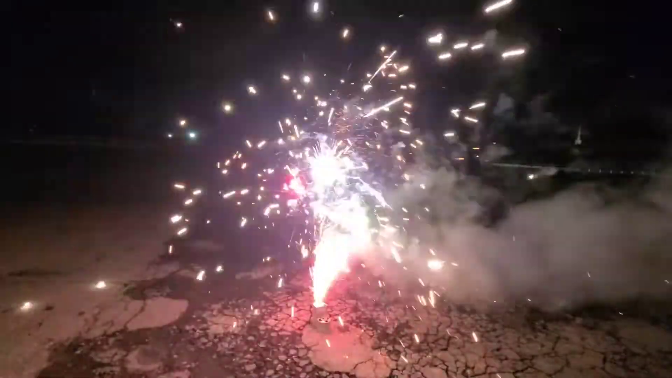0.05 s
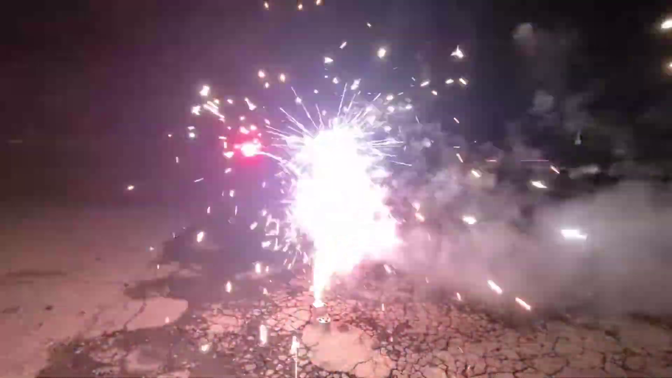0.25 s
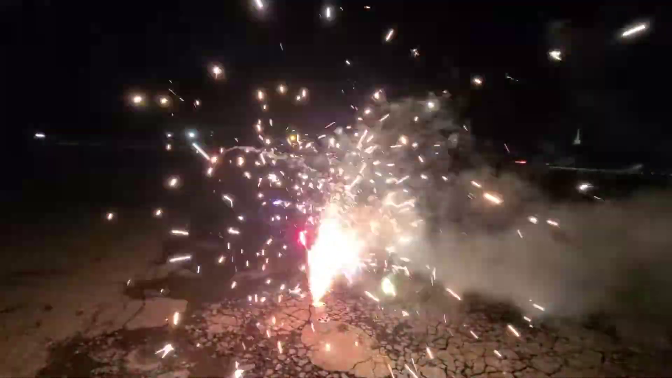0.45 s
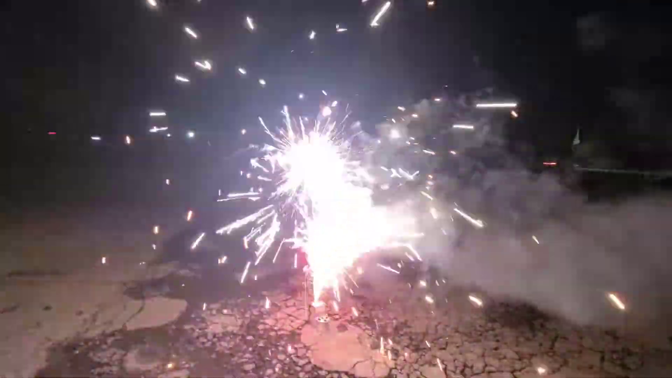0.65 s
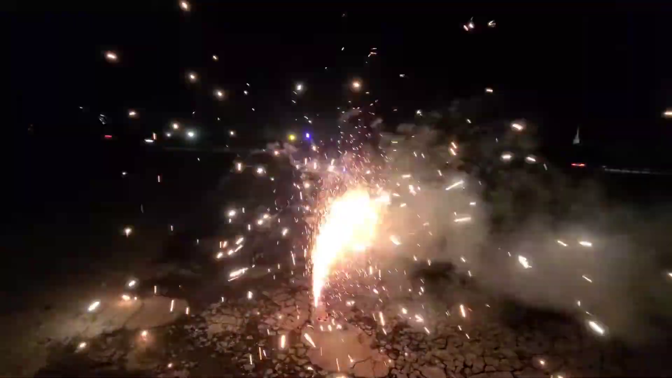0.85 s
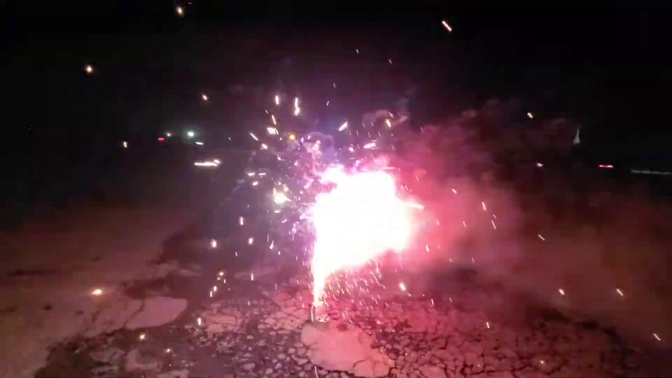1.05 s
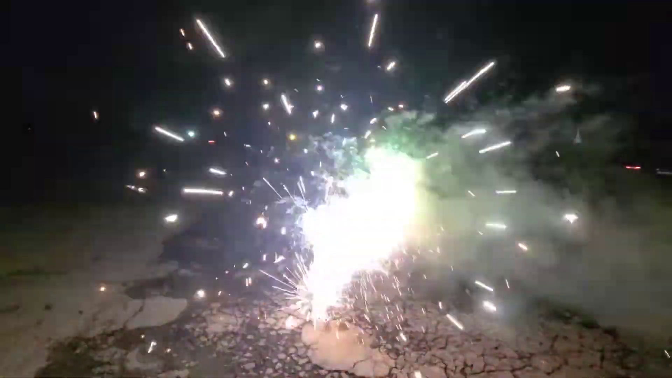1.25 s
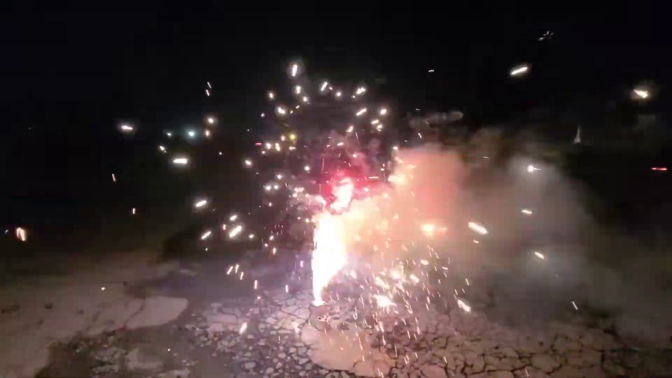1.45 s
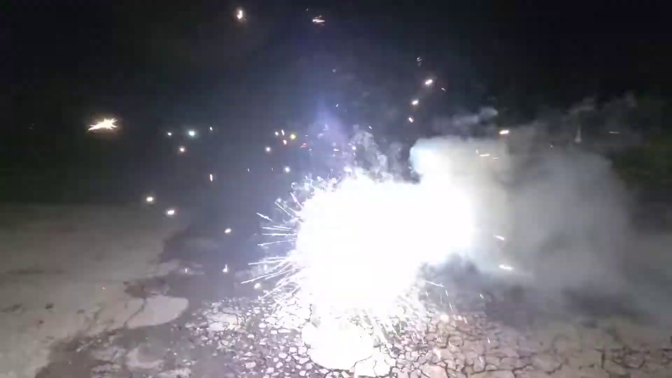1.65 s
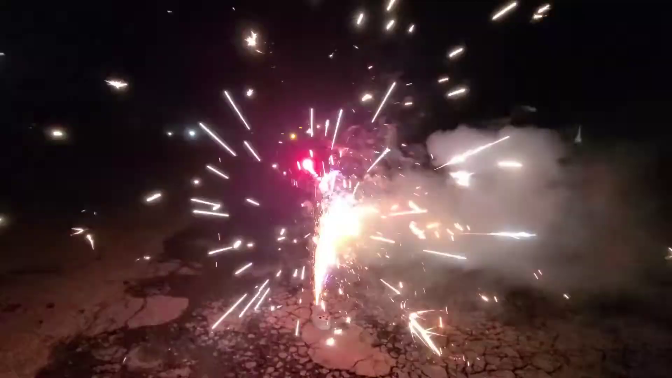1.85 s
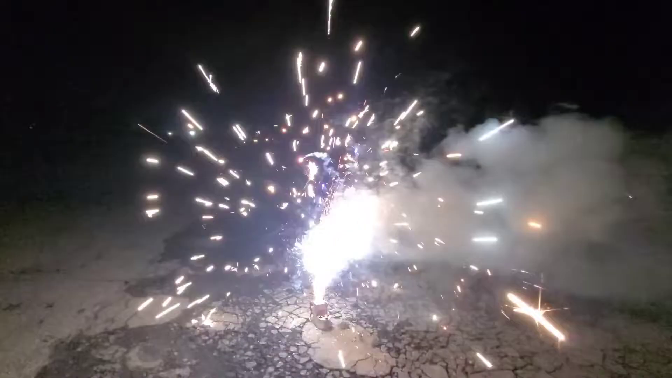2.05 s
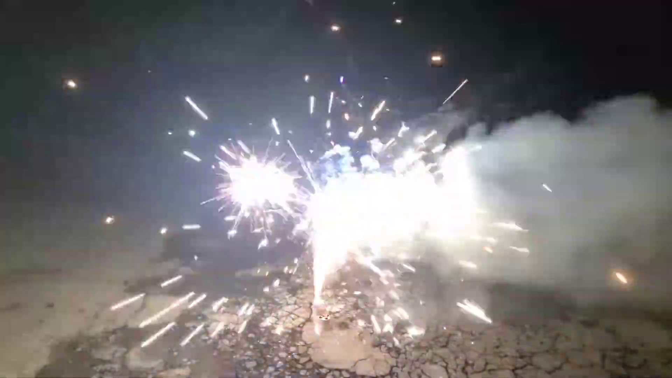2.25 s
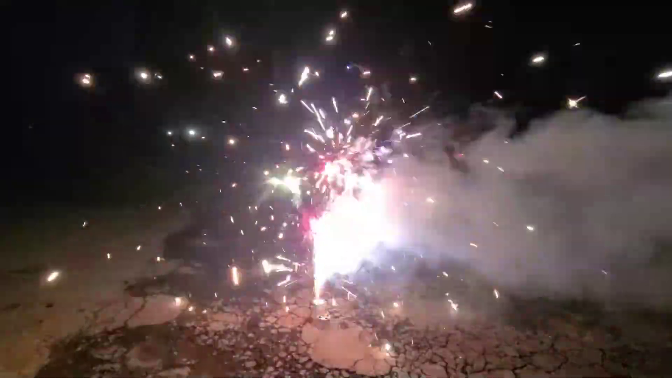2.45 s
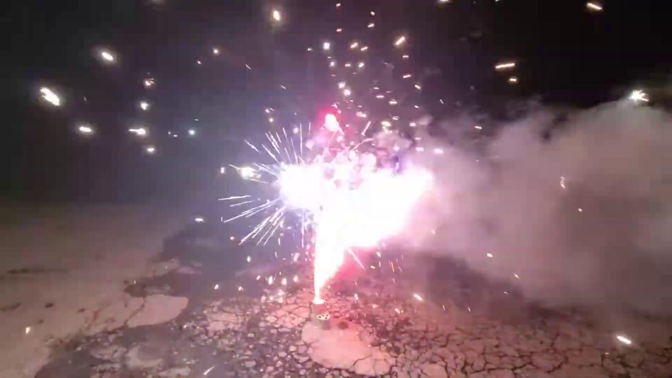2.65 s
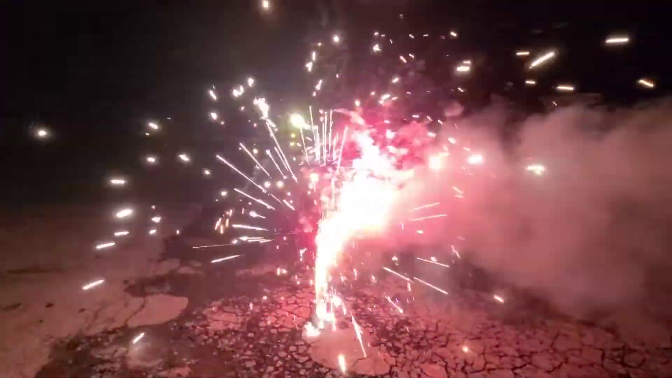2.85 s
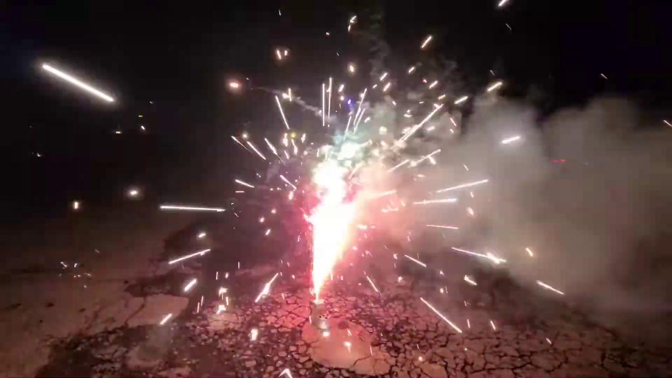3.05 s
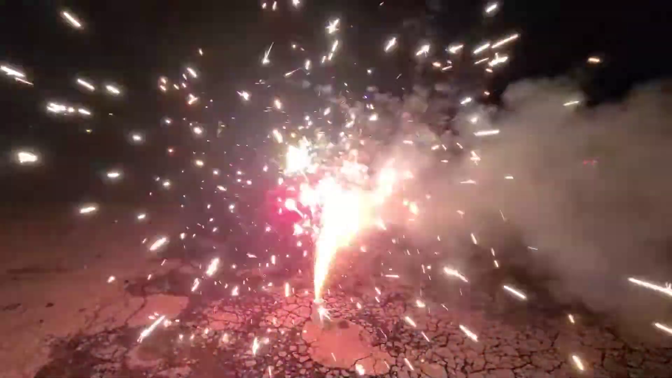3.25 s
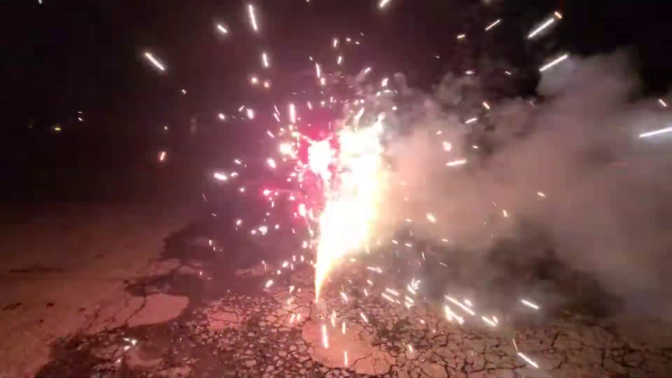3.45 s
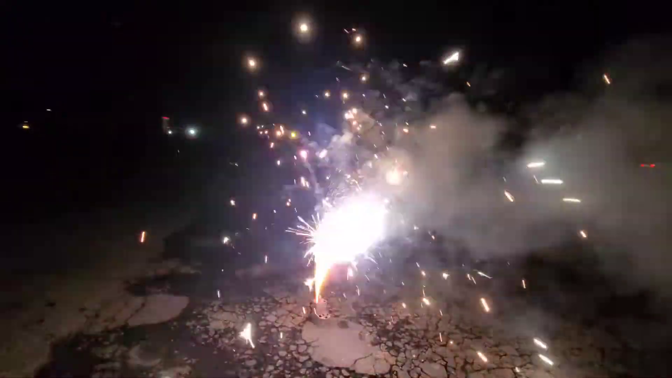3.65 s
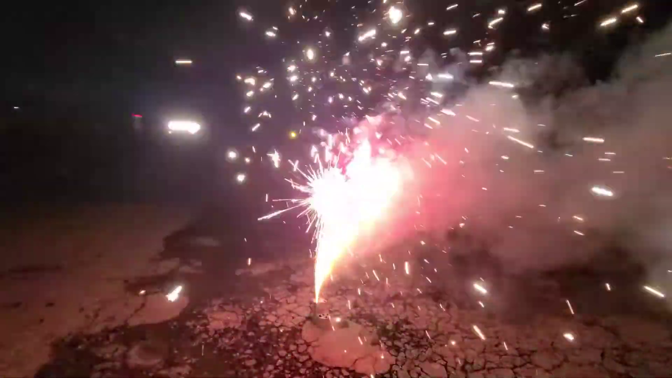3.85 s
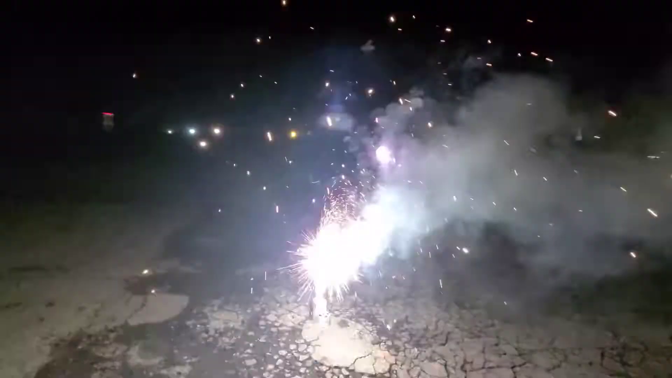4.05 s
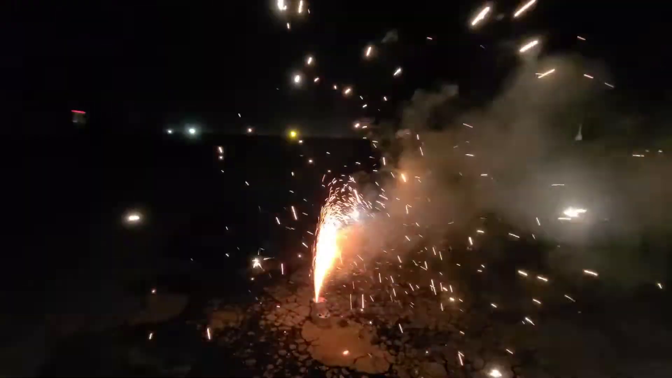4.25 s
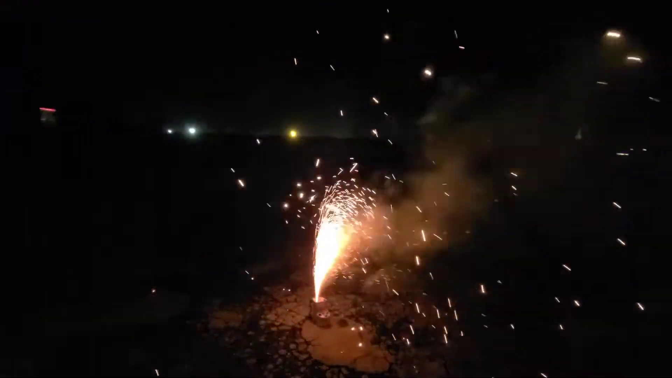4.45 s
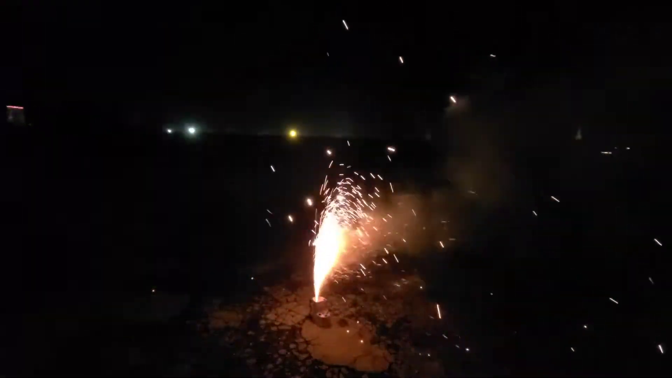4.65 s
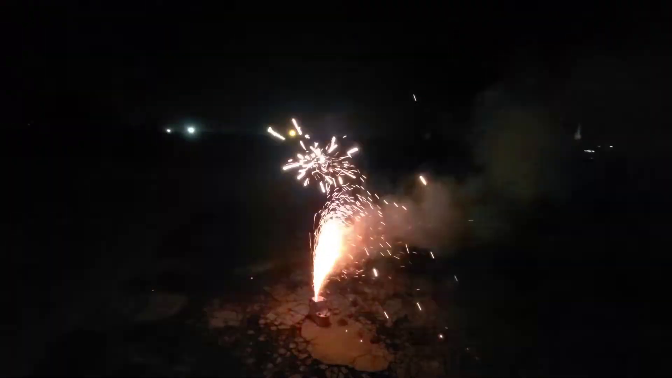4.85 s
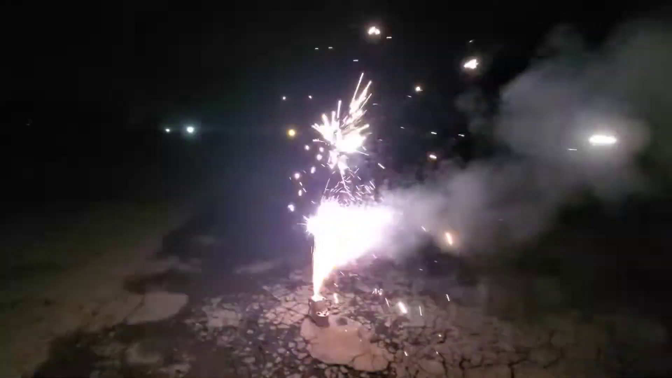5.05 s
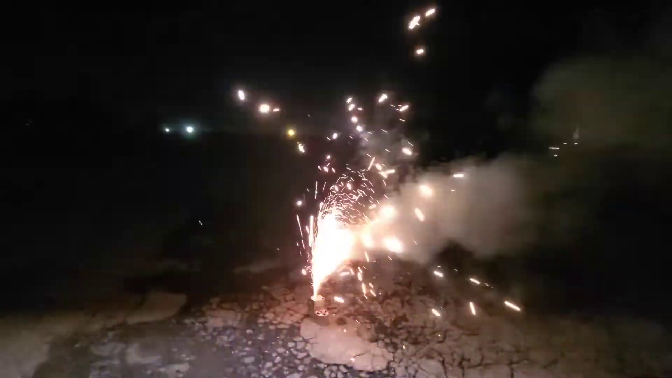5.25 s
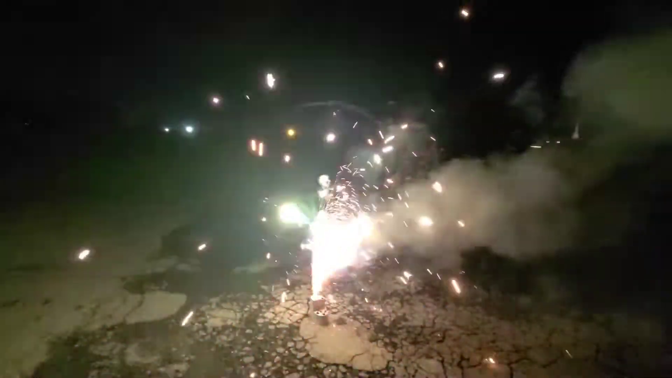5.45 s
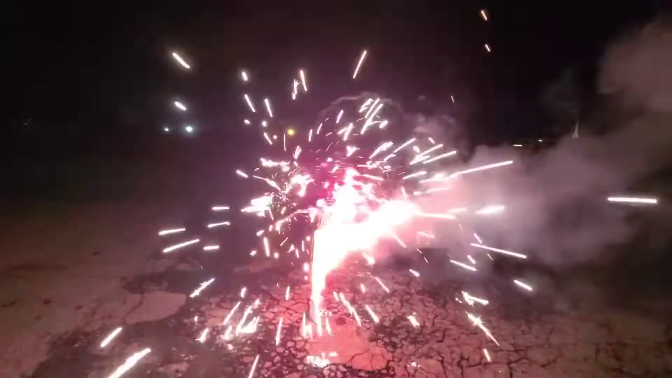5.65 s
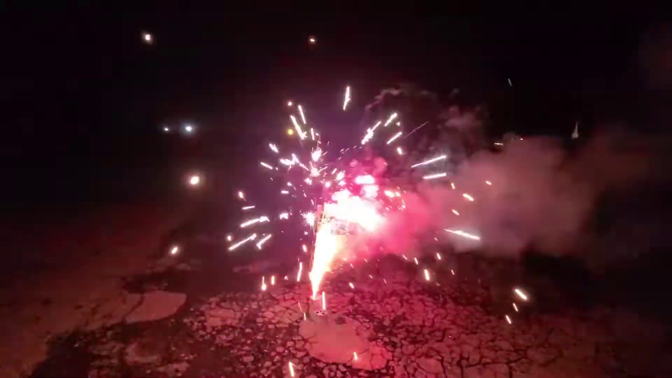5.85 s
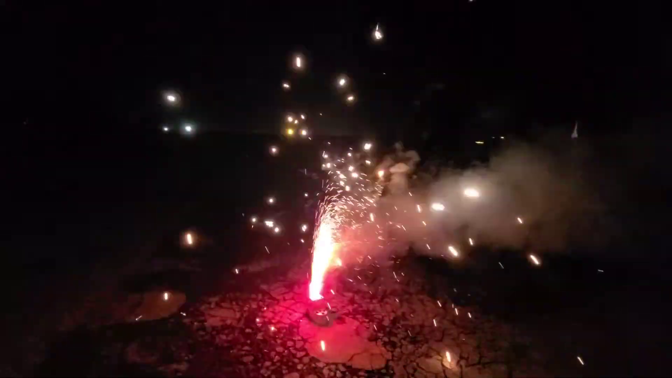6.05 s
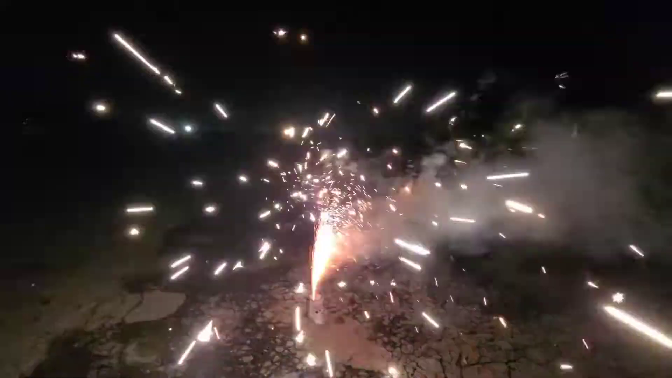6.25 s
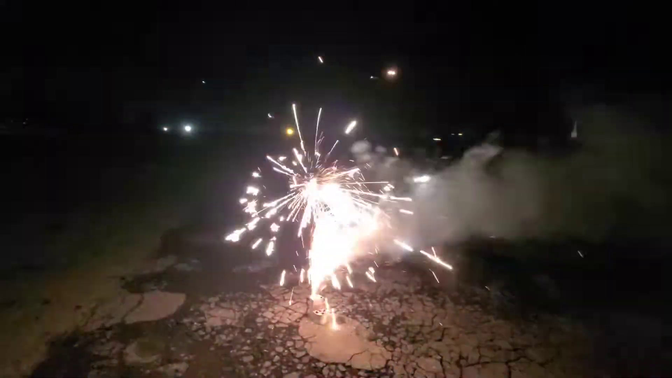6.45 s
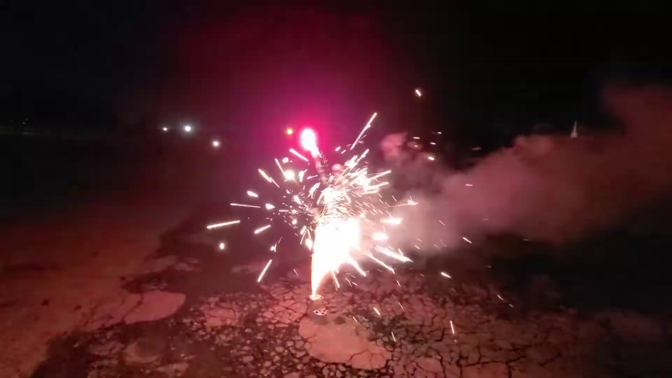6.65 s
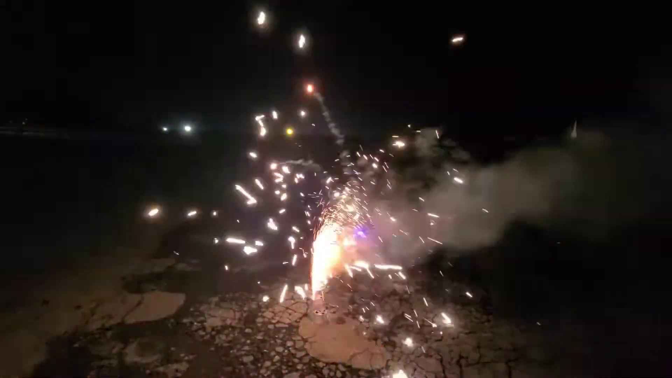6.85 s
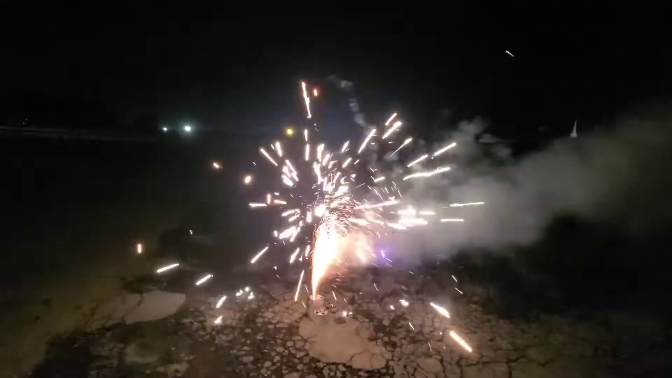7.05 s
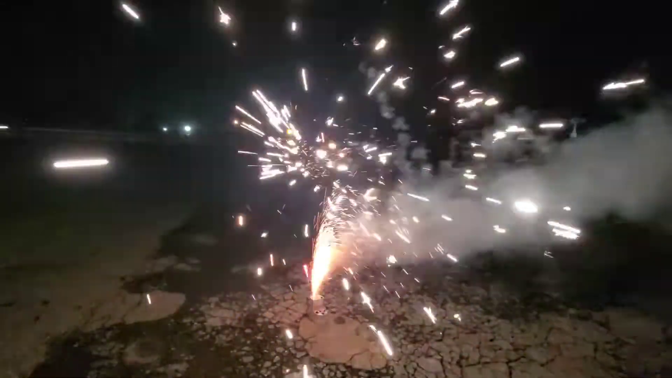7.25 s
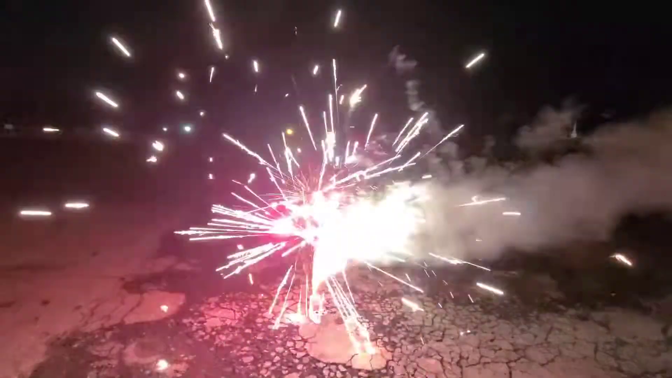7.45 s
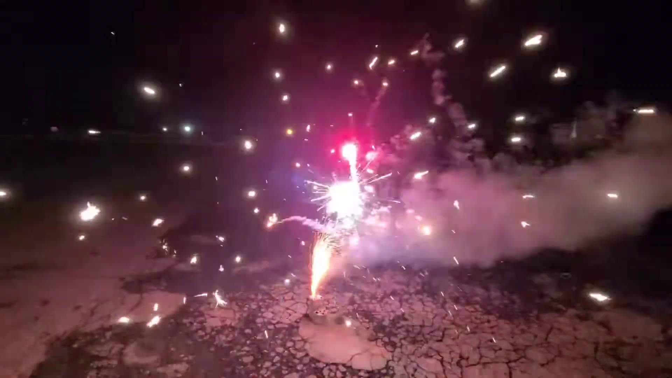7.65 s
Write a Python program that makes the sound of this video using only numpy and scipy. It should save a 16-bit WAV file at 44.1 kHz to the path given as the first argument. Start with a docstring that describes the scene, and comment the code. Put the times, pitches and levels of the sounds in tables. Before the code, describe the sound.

A ground firework fountain burns a few metres away in an open lot at night. Hard, dry cracks come thick and irregular, roughly a dozen or more a second at first, with tiny ticks around them and short scattered echoes. Midway they nearly stop and the hissing jet swells into a rushing roar with low rumble, then the crackling returns and runs to the end. Handheld stereo microphone, close and bright.

```python
"""Crackling stars burst from a firework fountain on cracked asphalt at night, a few metres from a camera.
Each is a tiny shock wave heard directly, off the ground and off something close by, then scattered over
the lot as shaped noise. Weak stars and sparks go off at random just after the loud ones. The jet hisses
as coloured noise over a low rumble of air and a far hum; in a lull, hiss and rumble surge together.
The camera is hand-held, and its two microphone ports differ in colour."""
import sys
import numpy as np
from scipy import signal
from scipy.fft import rfft, irfft, next_fast_len
from scipy.io import wavfile
from scipy.ndimage import map_coordinates

SR = 44100
rng = np.random.default_rng(int(sys.argv[2]) if len(sys.argv) > 2 else 0)


def inscribe(sig):
    """Save sig as 16-bit PCM at rate SR to the path in sys.argv[1].

    A 1-D sig is mono; a 2-D sig holds one channel per row.
    Samples are clipped to [-1, 1] before scaling.
    """
    pcm = np.round(np.clip(np.atleast_2d(sig).T, -1, 1) * 32767)
    wavfile.write(sys.argv[1], SR, pcm.astype(np.int16))


N = 339570  # length in samples

MIC_HZ, TOP_HZ = 14750, 16400  # upper band edges of the microphone and of the camera
USUAL_BODY_DB, CREST_DB = -17.5, 12  # body of an average star; its nominal peak over its 10 ms level
ONSET_S = 0.0015  # constant added to every listed time

# Loud stars a few metres from the camera. Each row: listed time in seconds, nominal peak in dB,
# body below 3 kHz relative to the peak in dB (less body makes a brighter star).
LOUD_STARS = [(0.014, -13.5, -21.5), (0.037, -10, -25), (0.057, -4.5, -29), (0.084, -7, -25),
              (0.101, -13.5, -34), (0.151, -7, -15), (0.178, -8, -19), (0.217, -7, -29), (0.256, -5.5, -19),
              (0.285, -8, -18), (0.344, -16.5, -14), (0.376, 0, -14), (0.386, -8, -13.5),
              (0.445, -4, -19.5), (0.511, -10.5, -25), (0.529, -5.5, -17.5), (0.598, -3.5, -14),
              (0.645, -12.5, -20), (0.72, -3.5, -16.5), (0.744, -8, -13), (0.774, -6.5, -15),
              (0.832, -4.5, -16), (0.888, -10, -16), (1.09, -8.5, -17.5), (1.182, -5, -17.5),
              (1.211, -3, -13.5), (1.254, -5, -11.5), (1.323, -3.5, -16.5), (1.344, -8.5, -29),
              (1.448, -4, -16), (1.477, -6, -25), (1.589, -4.5, -18.5), (1.616, -4.5, -18),
              (1.773, -2.5, -18.5), (1.787, -2.5, -21), (1.875, -7, -22), (1.948, -3, -18),
              (2.028, -7.5, -19.5), (2.083, -2.5, -16), (2.118, -4.5, -17), (2.187, -15.5, -18),
              (2.253, -8, -22), (2.296, -4, -10.5), (2.322, -5, -15), (2.367, -2, -19.5),
              (2.401, -8, -17.5), (2.456, -2.5, -18), (2.532, -8.5, -21.5), (2.592, -1.5, -17.5),
              (2.622, -4.5, -17), (2.708, -12, -25), (2.775, -4, -13.5), (2.79, -13.5, -17),
              (2.817, -3.5, -22.5), (2.887, -4, -19.5), (2.95, -4, -16), (3.0, -13.5, -16),
              (3.008, -5, -15), (3.033, -5.5, -27), (3.082, -6, -17), (3.147, -3.5, -16.5),
              (3.205, -4.5, -17.5), (3.243, -5, -22), (3.263, -4, -14.5), (3.286, -6.5, -20),
              (3.398, -10.5, -25), (3.423, -11, -26), (3.434, -5.5, -22.5), (3.456, -5.5, -22.5),
              (3.48, -9, -21), (3.494, -4, -15), (3.636, -6.5, -14), (3.765, -7, -22), (3.775, -11, -18),
              (3.827, -3.5, -17), (3.9, -2.5, -20), (3.964, -8.5, -9), (4.179, -2, -15), (4.433, -21, -10),
              (4.921, -8.5, -13), (4.938, -10, -12.5), (5.006, -4, -15.5), (5.122, -9, -11.5),
              (5.176, -6, -11), (5.212, -5.5, -13.5), (5.31, -12.5, -17), (5.387, -3.5, -15.5),
              (5.451, -6.5, -18.5), (5.557, -23, -9), (5.661, -4.5, -18), (5.688, -3, -22.5),
              (5.707, -10, -21), (5.716, -3.5, -16), (5.924, -4.5, -22.5), (5.991, -17.5, -17),
              (6.025, -4.5, -20.5), (6.191, -3.5, -13), (6.213, -1, -18.5), (6.313, -6, -20),
              (6.523, -5, -15), (6.578, -5.5, -14), (6.756, -2.5, -16), (6.865, -5.5, -17),
              (6.883, -10.5, -18), (6.922, -7, -20.5), (7.036, -11, -23), (7.123, -4.5, -15),
              (7.14, -4.5, -21), (7.278, -4, -15.5), (7.344, -4.5, -11), (7.438, -17.5, -21),
              (7.49, -3, -15.5), (7.557, -4.5, -19.5), (7.579, -4.5, -19), (7.619, -4.5, -18),
              (7.64, -5, -18)]
# Open lot around the fountain, colour of its scattered echoes. Each row: frequency in Hz, level in dB per Hz.
LOT_SCATTER = [(100, -9.5), (250, -5.5), (700, 0.5), (1000, -6.5), (1400, -3.5), (2600, -4.5), (4300, -6),
               (6500, -2.5), (9000, -3), (13000, -2)]


def stars():
    """Loud bursts, each sending back a spray of echoes from the open lot."""
    cracks, power = np.zeros((2, N)), np.zeros((1, N))
    t = np.arange(SR // 2) / SR
    # nearby ground answers at once; distant things answer faintly and for longer
    near = amp(1.5) * np.exp(-t / 0.012)
    far = amp(-14.5) * np.exp(-t / 0.053)
    onset = 1 - np.exp(-t / 0.0029)
    echo_power = (near ** 2 + far ** 2) * onset ** 2
    for listed_s, peak_db, body_db in LOUD_STARS:
        level_db = peak_db - CREST_DB
        crack = burst(USUAL_BODY_DB - body_db, lean(peak_db))
        add(cracks, listed_s + ONSET_S, amp(level_db + 3.0) * crack)
        add(power, listed_s + ONSET_S, amp(level_db) ** 2 * echo_power[None])
    uneven = amp(2 * wobble(260))
    spray = uneven * np.sqrt(power) * rush(lambda hz: along(LOT_SCATTER, hz))
    add(spray, .095, amp(-27) * cracks)  # slap from a far wall
    return cracks + spray


# Star at close range, colour of its crack. Each row: frequency in Hz, level in dB per Hz.
CRACK_COLOUR = [(88, -55), (150, -10.5), (355, -1.5), (541, -2), (722, 0), (1060, -3.5), (1280, 0.5),
                (1810, -1.5), (2760, -8), (3280, -3), (3890, -9), (5930, -3), (9220, -9), (11200, -1),
                (14600, -6)]
# The camera's two microphone ports, near sounds. Each row: frequency in Hz, left minus right in dB.
NEAR_PORTS = [(150, -1), (400, -4), (1400, -7), (3200, -5), (5000, -1), (7500, -1.5), (10500, -2.5),
              (12200, 4.5), (14000, 9)]


def burst(treble_db, pan_db, count=9):
    """One star by three paths over gritty asphalt; 40 ms with the energy of 10 ms at rms 1."""
    t = np.arange(SR // 25) / SR
    height, place, ground, near, slow = rng.standard_normal(5)
    # delay in s and level in dB: direct, off the ground, off something close by
    paths = [(0, 0),
             (.0027 + .0004 * height, -1 + 2 * ground),
             (0.0077 + .0003 * place, -5.5 + 2 * near)]
    # bright stars tear apart with more fizz; dark ones snap more cleanly
    grit = 0.016 * amp(0.17 * treble_db + 2 * slow)
    wave = grit * rng.standard_normal((2, len(t))) * np.exp(-t / 0.012)
    rattle_s = 0.00056 * np.exp(0.077 * slow)
    for delay_s, path_db in paths:
        add(wave, delay_s, amp(path_db) * shock(t, rattle_db=5.5, rattle_s=rattle_s))
    tilt = [(2000, 0), (6500, 1)]  # Hz, share of the treble gain
    # no two stars split alike
    own = np.transpose([np.geomspace(300, MIC_HZ, count), 1.6 * rng.standard_normal(count)])

    def gain(hz):
        colour_db = along(CRACK_COLOUR, hz) + along(own, hz) + (treble_db - 3.5) * along(tilt, hz)
        return amp(colour_db) * sides(along(NEAR_PORTS, hz) + pan_db)

    return unit(coloured(wave, gain)) / 2


def shock(t, rattle_db, rattle_s):
    """One pressure jump, left port one sample first, and a brief separate rattle in each port."""
    jump = np.array([t == t[0], t == t[1]]) * 1.
    rattle = rng.standard_normal((2, len(t))) * np.sqrt(t) * np.exp(-t / rattle_s)
    rattle = signal.lfilter([1, -.6], [1], rattle)  # thins the bass
    return jump + amp(rattle_db) * unit(rattle) / np.sqrt(len(t))


# strong stars lean right, weak ones left: mean-centred peak, dB of pan per dB of peak,
# widest lean before the scatter, random scatter
CENTRE_PEAK_DB, LEAN, WIDEST_DB, PAN_SCATTER_DB = -7, 0.85, 4.5, 3


def lean(peak_db):
    """Left minus right dB for a star of this strength, with random scatter."""
    mean_db = np.clip(LEAN * (CENTRE_PEAK_DB - peak_db), -WIDEST_DB, WIDEST_DB)
    return mean_db + PAN_SCATTER_DB * rng.standard_normal()


# weak stars: lowest nominal peak, range above it, longest wait after a loud one
WEAK_PEAK_DB, WEAK_SPREAD_DB, WEAK_WAIT_S = -18.5, 4, 0.035


def weak_stars(count=20):
    """Weak, bright stars thrown up with the loud ones burst just after them."""
    out = np.zeros((2, N))
    for pick, wait, size, fizz in rng.random((count, 4)):
        listed_s = LOUD_STARS[int(pick * len(LOUD_STARS))][0]
        burst_s = listed_s + ONSET_S + WEAK_WAIT_S * wait
        peak_db = WEAK_PEAK_DB + WEAK_SPREAD_DB * size
        crack = burst(7 * fizz, lean(peak_db))
        add(out, burst_s, amp(peak_db - CREST_DB + 4.5) * crack)
    return out


def sparks(count=110):
    """Small fragments burst as faint ticks up to 60 ms after their star."""
    out = np.zeros((2, N))
    for pick, wait, size in rng.random((count, 3)):
        listed_s, peak_db, body_db = LOUD_STARS[int(pick * len(LOUD_STARS))]
        level_db = peak_db - CREST_DB - 21.5 + 9.2 * size ** 2
        tick = burst(USUAL_BODY_DB - body_db, lean(peak_db))
        add(out, listed_s + ONSET_S + 0.06 * wait, amp(level_db) * tick)
    return out


JET_DB = -40.5  # hiss before its surge, its flutter and the earlier echoes
EARLIER_ECHO_DB, EARLIER_ECHO_S = 7.5, 0.1  # lift of the hiss at the start; its decay
JET_SURGE_DB, JET_RISE_S, JET_FALL_S = 5, 0.46, 0.58
ROAR_DB = -41  # roar at full surge, before its flutter

# Nozzle on the asphalt, broad colour of the hiss. Each row: frequency in Hz, level in dB per Hz.
JET_COLOUR = [(180, -42), (300, -4.5), (1100, -12), (1760, -12.5), (3170, -14.5), (5510, -20), (6270, -9.5),
              (7030, -18.5), (14600, -15)]
# Resonances that colour the jet. Each row: centre in Hz, width in Hz, boost in dB.
JET_RESONANCES = [(1280, 110, 10.5), (1833, 260, 13), (3935, 100, 12.5), (5780, 1100, 7)]
# Middle-range roar of the surging jet. Each row: frequency in Hz, level in dB per Hz.
JET_ROAR = [(300, -11), (1000, -7), (1900, 1.5), (2900, -7), (4500, -24), (9000, -35)]


def jet():
    """Gas rushes from the nozzle with a flutter; as it surges it grows louder and roars."""
    def colour(hz):
        peaks_db = sum(db / (1 + (2 * (hz - centre) / width) ** 2) for centre, width, db in JET_RESONANCES)
        return along(JET_COLOUR, hz) + peaks_db

    push = surge(JET_RISE_S, JET_FALL_S)
    # fading echoes of earlier crackle, given the jet's hiss colour
    earlier_echo_db = EARLIER_ECHO_DB * np.exp(-np.arange(N) / SR / EARLIER_ECHO_S)
    flow_db = JET_DB + JET_SURGE_DB * push + earlier_echo_db + 1.9 * wobble(5)
    hiss = amp(flow_db + 0.32 * wobble(41)) * rush(colour)
    roar = amp(ROAR_DB + 2.8 * wobble(30)) * rush(lambda hz: along(JET_ROAR, hz))
    return hiss + push * roar


SURGE_START_S, SURGE_END_S = 4.39, 5.313  # the surge starts to rise; it starts to fall


def surge(rise_s, fall_s):
    """Rise, hold and fall, from 0 to 1, of the surge shared by hiss and rumble."""
    t = np.arange(N) / SR
    rise = (t - SURGE_START_S) / rise_s
    fall = 1 - (t - SURGE_END_S) / fall_s
    return np.clip(np.minimum(rise, fall), 0, 1)


BREEZE_DB, BREEZE_DB_PER_S = -48, 0.89  # rumble at the start, before its lumps; its slow growth
AIR_SURGE_DB, AIR_RISE_S, AIR_FALL_S = 9.5, 0.27, 0.12

# Air rumbling in the microphone ports. Each row: frequency in Hz, level in dB per Hz.
AIR_RUMBLE = [(12, -29), (25, -8), (50, -1.5), (85, -5), (130, -8), (250, -10.5), (400, -24), (800, -61)]


def breeze():
    """Gusty low noise of moving air, its lumps partly each port's own."""
    lumps = amp(2.2 * wobble(9) + 0.9 * np.array([wobble(27), wobble(18)]))
    growth_db = BREEZE_DB_PER_S * np.arange(N) / SR
    gust_db = BREEZE_DB + growth_db + AIR_SURGE_DB * surge(AIR_RISE_S, AIR_FALL_S)
    return amp(gust_db) * lumps * rush(lambda hz: along(AIR_RUMBLE, hz))


def hum(hz=70, width_hz=9):
    """Narrow-band noise: a low wavering hum far off, like an idling engine."""
    return amp(-49) * rush(lambda f: -20 * np.log10(1 + ((f - hz) / width_hz) ** 2))


# The two ports in a wide sound field. Each row: frequency in Hz, left-right likeness (1 is identical).
PORT_LIKENESS = [(60, 0.95), (300, 0.84), (1500, 0.06), (5000, 0.17), (12000, 0.15)]
# The two ports, sounds from all around. Each row: frequency in Hz, left minus right in dB.
FAR_PORTS = [(200, 0), (1300, -1.5), (3000, 2), (6500, 5), (11000, 4.5), (13500, 13)]


def rush(colour_db, size=N):
    """Stereo noise of rms 1, near mono in the bass and wide in the treble."""
    m = next_fast_len(size)
    hz = np.fft.rfftfreq(m, 1 / SR)
    # the mix of mid and side sets how alike the ports are
    turn = np.arccos(np.clip(along(PORT_LIKENESS, hz), -1, 1)) / 2
    noise = rfft(rng.standard_normal((2, m))) * amp(colour_db(hz))
    mid, side = noise * [np.cos(turn), np.sin(turn)]
    ports = np.array([mid + side, mid - side]) * sides(along(FAR_PORTS, hz))
    return unit(irfft(ports, m)[:, :size])


def amp(db):
    """Decibels to gain."""
    return 10 ** (np.asarray(db) / 20)


def unit(x):
    """Scale to rms 1."""
    return x / np.sqrt(np.mean(x ** 2) + 1e-20)


def along(points, hz):
    """Read (Hz, value) points on a log frequency axis."""
    f, v = np.transpose(points)
    return np.interp(np.log(hz + 1), np.log(f + 1), v)


def wobble(rate):
    """A smooth random curve, rate knots a second."""
    knots = rng.standard_normal(int(N * rate / SR) + 4)
    return map_coordinates(knots, [np.arange(N) * rate / SR])


def sides(db):
    """Left and right gains for a level difference, at constant power."""
    g = amp(np.array([db, -db]) / 2)
    return g / np.sqrt(np.mean(g ** 2, axis=0))


def coloured(x, gain):
    """Causal (minimum-phase) filter with the given gain over frequency."""
    m = 2 * next_fast_len(x.shape[-1] // 2 + 2048)
    log_gain = np.log(np.maximum(gain(np.fft.rfftfreq(m, 1 / SR)), 1e-6))
    # folding the cepstrum onto positive time makes the phase minimal
    cepstrum = irfft(log_gain, m)
    cepstrum[..., 1:m // 2] *= 2
    cepstrum[..., m // 2 + 1:] = 0
    return irfft(rfft(x, m) * np.exp(rfft(cepstrum)), m)[..., :x.shape[-1]]


def add(track, s, sound):
    """Mix a sound into the track at time s."""
    part = track[:, max(round(s * SR), 0):][:, :sound.shape[1]]
    part += sound[:, :part.shape[1]]


def low_pass(x, hz):
    """A steep elliptic low-pass."""
    return signal.sosfilt(signal.ellip(12, .1, 80, hz, fs=SR, output="sos"), x)


def scene():
    """Stars and sparks over the burning jet, the breeze and the distant hum."""
    return stars() + weak_stars() + sparks() + jet() + breeze() + hum()


def record(dry):
    """The microphone's band ends sharply, high peaks are rounded off, then the camera limits the band."""
    heard = low_pass(dry, MIC_HZ)
    top = 0.85  # ceiling of the rounding
    rounded = heard / (1 + (heard / top) ** 4) ** (1 / 4)
    return low_pass(rounded, TOP_HZ)


dry = scene()
out = record(dry)
inscribe(out)
```